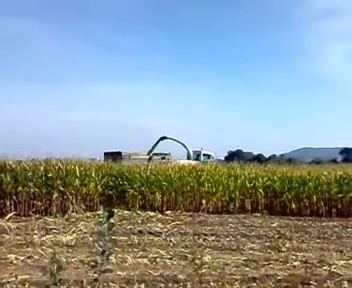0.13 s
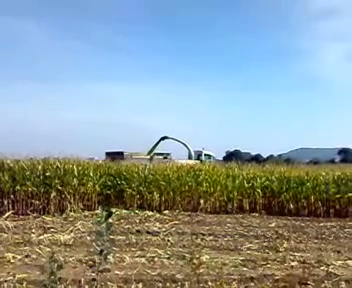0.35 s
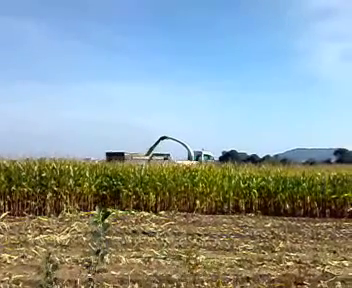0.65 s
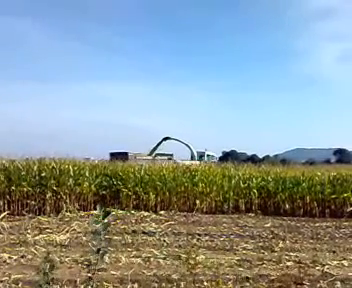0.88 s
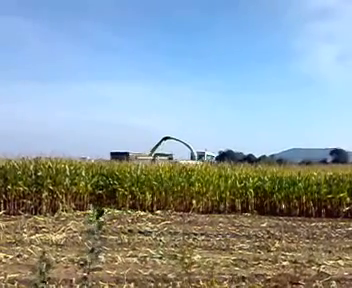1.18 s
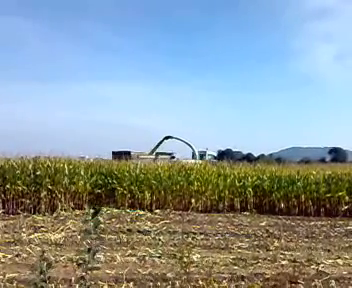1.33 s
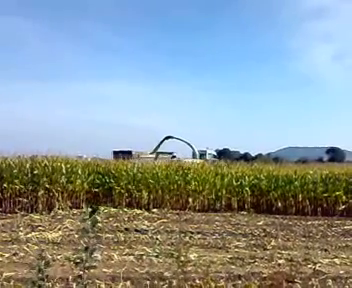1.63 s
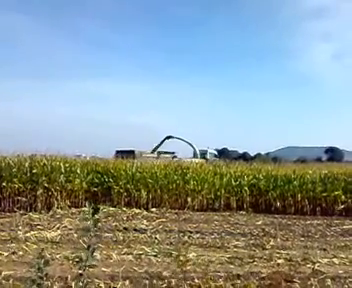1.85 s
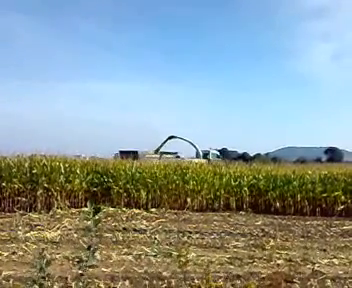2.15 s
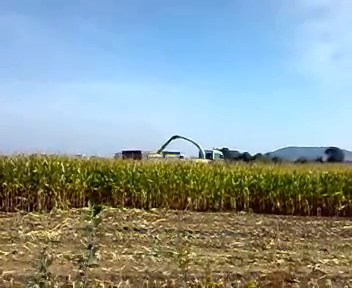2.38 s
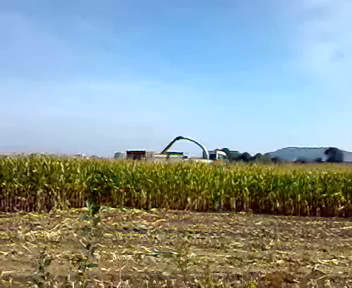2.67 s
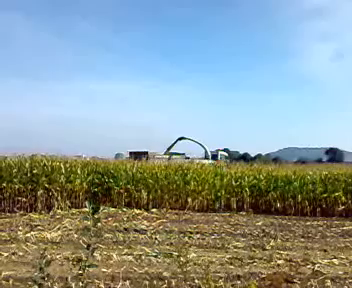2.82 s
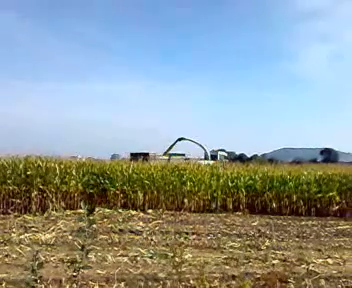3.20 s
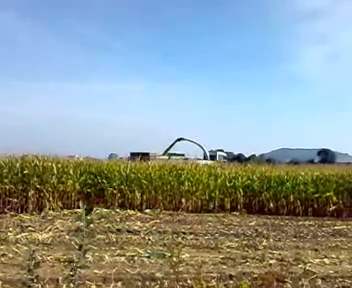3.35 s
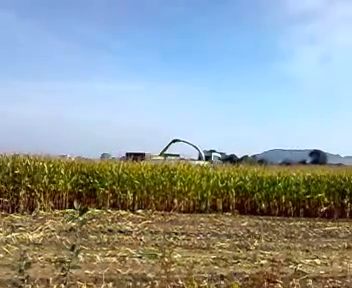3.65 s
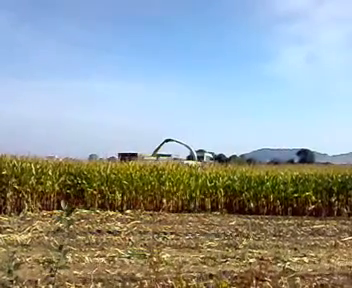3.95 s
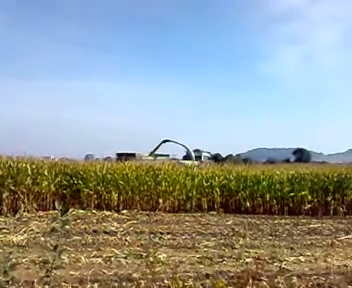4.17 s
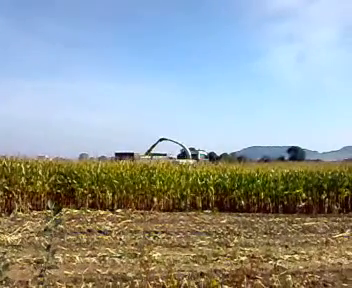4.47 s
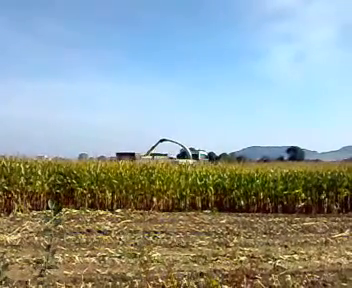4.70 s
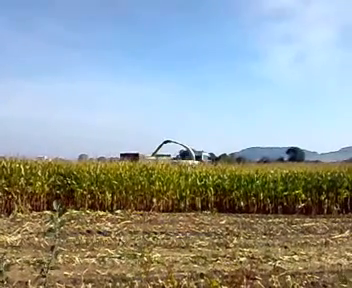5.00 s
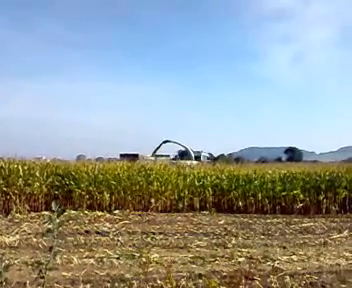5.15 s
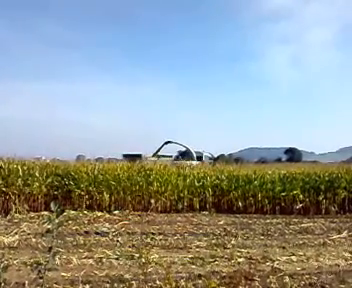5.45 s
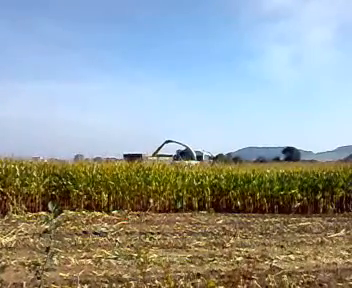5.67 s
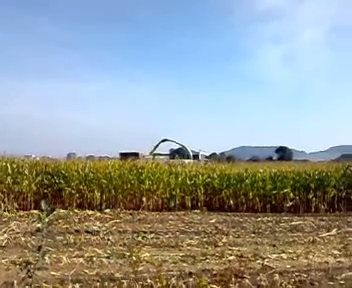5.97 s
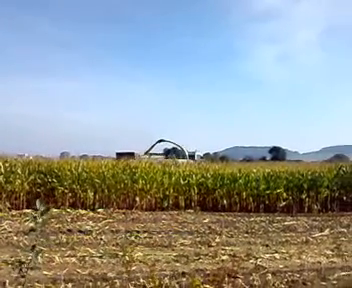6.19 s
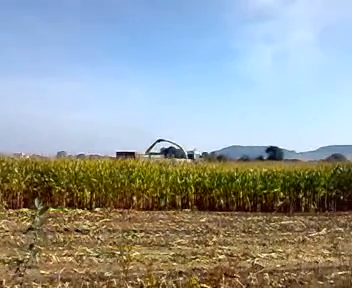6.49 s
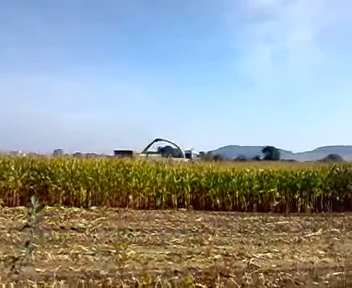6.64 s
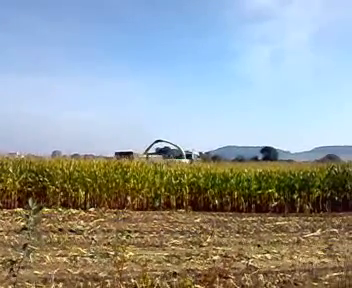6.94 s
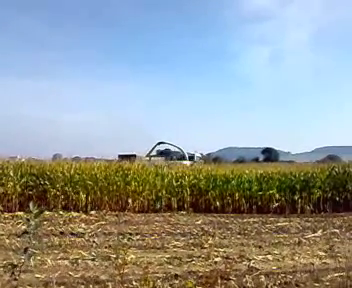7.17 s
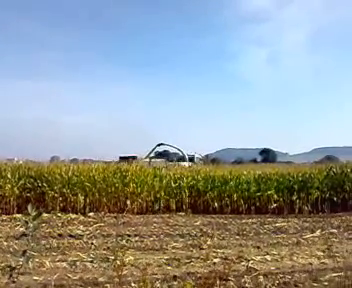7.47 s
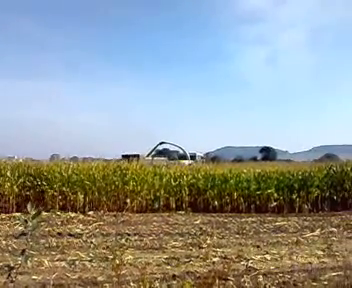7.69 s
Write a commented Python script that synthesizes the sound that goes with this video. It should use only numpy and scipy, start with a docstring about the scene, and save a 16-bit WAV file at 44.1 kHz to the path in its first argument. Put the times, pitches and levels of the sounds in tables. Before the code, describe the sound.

Distant heavy diesel machinery hums low and wavering, with a rough chopping roar, hissing crop debris and brief crackling bursts, gradually drawing away.

```python
"""A forage harvester drones, hums and roars as it chops maize in an open field and slowly draws away.
The diesel, knife hum, shaft whine and fan tone are sine waves locked to one wavering speed.
Shaped noise makes the low rumble, the housing's boom and roar, and a light breeze.
Showers of random clicks make the rattling crop, the spout's ring and hiss, and the crashing clumps."""
import sys
import numpy as np
from scipy import signal
from scipy.fft import rfft, irfft, next_fast_len
from scipy.io import wavfile
from scipy.ndimage import uniform_filter1d, map_coordinates

SR = 44100
rng = np.random.default_rng(int(sys.argv[2]) if len(sys.argv) > 2 else 0)


def inscribe(sig):
    """Save sig as 16-bit PCM at rate SR to the path in sys.argv[1].

    A 1-D sig is mono; a 2-D sig holds one channel per row.
    Samples are clipped to [-1, 1] before scaling.
    """
    pcm = np.round(np.clip(np.atleast_2d(sig).T, -1, 1) * 32767)
    wavfile.write(sys.argv[1], SR, pcm.astype(np.int16))


N = 345303


def amp(db):
    """Turn decibels into a gain."""
    return 10 ** (np.asarray(db) / 20)


def unit(x):
    """Scale a sound to an rms (average strength) of 1."""
    return x / np.sqrt(np.mean(x ** 2) + 1e-20)


def curve(rows):
    """Join (seconds, value) points with straight lines, one value per sample."""
    seconds, values = np.transpose(rows)
    return np.interp(np.arange(N) / SR, seconds, values)


def receding(start_db, fade_db_per_s):
    """Level in dB of a source that draws steadily away."""
    return start_db - fade_db_per_s * np.arange(N) / SR


def wobble(rate):
    """A smooth random curve through `rate` random points a second."""
    knots = rng.standard_normal(2048)
    # work out the curve at every 64th sample, then join those with lines
    coarse = np.arange(0, N + 64, 64)
    smooth = map_coordinates(knots, [coarse * rate / SR], mode="wrap")
    return np.interp(np.arange(N), coarse, smooth)


def filtered(x, response):
    """Multiply each frequency of x by the gain that response(hz) gives."""
    padded = next_fast_len(N + SR // 2)
    gain = response(np.fft.rfftfreq(padded, 1 / SR))
    return irfft(rfft(x, padded) * gain, padded)[:N]


def coloured(x, spectrum):
    """Shape x with (Hz, dB) points that fall away past both ends, then scale to rms 1."""
    hz_points, db_points = np.transpose(spectrum)
    hz_points = np.r_[hz_points[0] / 2, hz_points, hz_points[-1] * 2]
    db_points = np.r_[-120, db_points, -120]

    def response(hz):
        return amp(np.interp(np.log(hz + 1), np.log(hz_points), db_points))

    return unit(filtered(x, response))


def patchy(x, depth_db, size, bins, frames):
    """Raise and lower random patches of the spectrum, smoothed over frequency bins and time frames."""
    spectrum = signal.stft(x, nperseg=size)[2]
    patches = uniform_filter1d(rng.standard_normal(spectrum.shape), size=bins, axis=0)
    patches = uniform_filter1d(patches, size=frames, axis=1)
    return signal.istft(spectrum * amp(depth_db * unit(patches)), nperseg=size)[1][:N]


def drifting(x):
    """Moving air over the field strengthens and weakens broad patches of the spectrum."""
    return patchy(x, depth_db=0.85, size=512, bins=7, frames=18)


def rippled(x):
    """Sound arriving by several paths over the crop gets fine, slowly shifting peaks and notches."""
    return patchy(x, depth_db=1.6, size=2048, bins=3, frames=20)


def partials(turns, orders, flutter_db, smear, flutter_rate):
    """Sines at multiples of a rotation, each unsteady in strength and phase (smear in radians)."""
    out = np.zeros(N)
    for order, db in orders:
        phase = 2 * np.pi * (round(order) * turns + rng.random())
        phase += smear * wobble(flutter_rate)
        out += amp(db + flutter_db * wobble(flutter_rate)) * np.sin(phase)
    return np.sqrt(2) * out


def impacts(rate, spread_db):
    """Chips of stalk strike steel as clicks of random time and size, `rate` a second on average."""
    struck = rng.random(N) < rate / SR
    sizes = rng.standard_normal(N) * amp(spread_db * rng.standard_normal(N))
    return unit(struck * sizes)


def knife_passes():
    """Add up the wavering drive speed into a running count of knife passes."""
    # Each row: time in seconds, knife passes per second.
    speed = [(0, 232), (.3, 232.1), (.55, 232.9), (.95, 233.2), (1.5, 232.2), (1.9, 232.1), (2.2, 233.2),
             (2.6, 230.1), (2.9, 232), (3.3, 229.8), (3.65, 231.4), (4, 233.6), (4.4, 233.4), (4.85, 235.2),
             (5.1, 233.4), (5.5, 232.6), (6.1, 233.4), (6.5, 232.2), (6.9, 234), (7.2, 233.7), (7.6, 235.8),
             (7.83, 235.4)]
    return np.cumsum(curve(speed)) / SR


def diesel(cuts):
    """A diesel under load: a firing tone, its third harmonic, and exhaust tones around them."""
    # Firing tone. Each row: time in seconds, level in dB (before a small trim below).
    firing_level = [(0, -25), (.25, -39), (.42, -44), (.53, -26), (1.05, -30.5), (1.4, -31), (1.75, -32),
                    (2.05, -26), (2.33, -40), (2.6, -29.5), (2.8, -40), (3.38, -34.5), (3.95, -37.5),
                    (4.75, -36), (5.3, -36.5), (5.6, -36.5), (6.35, -40.5), (6.9, -33), (7.25, -40.5),
                    (7.5, -31.5), (7.83, -42)]
    # Third harmonic of the firing tone. Each row: time in seconds, level in dB.
    buzz_level = [(0, -45), (.8, -59), (1.05, -40.5), (1.5, -57), (1.95, -40), (2.3, -46), (2.62, -41.5),
                  (3, -50), (3.5, -42), (4, -52.5), (7.83, -52)]
    # Exhaust tones. Each row: multiple of the four-stroke cycle, relative level in dB.
    exhaust_tones = [(3, -6), (5, -7.5), (7, -8.5), (9, -3), (10, -6), (13, -17.5), (16, -10), (18, -13),
                     (40, -13.5), (48, -16.5), (72, -14.5)]
    cycles = cuts / 13.54
    firings = 8 * cycles
    firing = partials(firings, [(1, -.7)], flutter_db=1.5, smear=0.21, flutter_rate=5.8)
    buzz = partials(firings, [(3, 0.0015)], flutter_db=2.0, smear=0.2, flutter_rate=5)
    exhaust = partials(cycles, exhaust_tones, flutter_db=3.0, smear=0.23, flutter_rate=4)
    exhaust_db = receding(-33.5, fade_db_per_s=0.5)
    return amp(curve(firing_level)) * firing + amp(curve(buzz_level)) * buzz + amp(exhaust_db) * exhaust


def knife_hum(cuts):
    """The knives hum once per pass: a direct tone plus a smeared one off the ground, and overtones."""
    # Each row: time in seconds, level of the hum in dB.
    hum_level = [(0, -27.5), (.6, -27.5), (.85, -31), (1, -25), (1.2, -30), (1.5, -29), (1.68, -30),
                 (1.85, -27), (2.2, -29), (2.4, -24), (2.8, -32.5), (3.12, -24), (3.38, -27.5), (3.5, -31),
                 (3.6, -25), (3.8, -38), (3.92, -23.5), (4.03, -42), (4.15, -27.5), (4.62, -33),
                 (4.9, -25.5), (5.25, -28.5), (5.45, -27), (5.7, -38.5), (6.05, -32), (6.33, -31.5),
                 (6.5, -41.5), (7, -31.5), (7.48, -42.5), (7.68, -27), (7.83, -41)]
    # Each row: time in seconds, level of the overtones in dB.
    overtone_level = [(0, -42), (.4, -54), (.62, -34), (.85, -49), (1.05, -40.5), (1.5, -43.5), (2.2, -45),
                      (3, -46.5), (3.7, -50.5), (4.3, -53.5), (7.83, -53)]
    # Each row: multiple of the knife rate, relative level in dB.
    overtone_mix = [(2, -0.5), (3, -3), (4, -1)]
    direct = partials(cuts, [(1, 0.0051)], flutter_db=0.3, smear=0.079, flutter_rate=9.3)
    ground = partials(cuts, [(1, 0)], flutter_db=1, smear=2.0, flutter_rate=9)
    # the ground's share, relative to the direct tone, grows by 1.5 dB a second
    ground *= amp(receding(-23, fade_db_per_s=-1.5))
    overtones = partials(cuts, overtone_mix, flutter_db=3.0, smear=0.65, flutter_rate=6.6)
    return amp(curve(hum_level)) * unit(direct + ground) + amp(curve(overtone_level)) * overtones


def shaft_whine(cuts):
    """A fast shaft whines at 3.408 turns per knife pass."""
    # Each row: time in seconds, level in dB.
    whine_level = [(0, -49.5), (.18, -37.5), (.6, -34), (1.1, -36), (1.4, -33.5), (1.7, -38), (1.92, -41),
                   (2.3, -46), (2.62, -32.5), (2.95, -50.5), (4.82, -53), (4.97, -35), (5.3, -41),
                   (5.65, -50), (6.5, -39), (6.8, -54), (7.83, -46)]
    whine = partials(cuts * 3.408, [(1, 0)], flutter_db=2.0, smear=0.058, flutter_rate=14.0)
    return amp(curve(whine_level)) * whine


def fan_tone(cuts):
    """The fan sounds one tone at 1.447 times the knife rate and fades as it draws away."""
    fan = partials(1.447 * cuts, [(1, 0)], flutter_db=3.0, smear=0.45, flutter_rate=3.6)
    return amp(receding(-43.5, fade_db_per_s=0.65)) * fan


def body():
    """The running machine rumbles, and the drum housing booms around the knife rate: shaped noise."""
    # Low rumble. Each row: frequency in Hz, strength in dB per Hz.
    rumble_colour = [(25, -16.5), (40, -7), (65, 1.9), (85, .5), (105, -0.5), (150, -1.3), (190, -6),
                     (260, -20.5), (400, -41.5)]
    # Each row: time in seconds, level of the rumble in dB.
    rumble_level = [(0, -27), (.75, -34), (1.05, -30), (1.42, -26), (1.8, -32), (2.1, -27), (2.55, -33),
                    (2.8, -29), (3.4, -27.5), (3.8, -31), (4.5, -31.5), (5.1, -31.5), (5.4, -32),
                    (6.4, -34.5), (7.83, -31)]
    # Housing's boom. Each row: frequency in Hz, strength in dB per Hz.
    boom_colour = [(150, -28.5), (205, -4.5), (225, 0), (260, 2.5), (276, 1), (295, -6), (315, -3),
                   (337, -14), (354, -19), (500, -45.5)]
    # Each row: time in seconds, level of the boom in dB.
    boom_level = [(0, -26.5), (.85, -30), (1.45, -26), (2.3, -29.5), (2.9, -26), (4.2, -30), (6.9, -28.5),
                  (7.5, -31)]
    rumble = coloured(rng.standard_normal(N), rumble_colour)
    boom = coloured(rng.standard_normal(N), boom_colour)
    return amp(curve(rumble_level)) * rumble + amp(curve(boom_level)) * boom


def chopping(cuts):
    """Knife passes pulse the roar and rattle, thick crop swells rattle and hiss, uneven feed flutters all."""
    # Each row: time in seconds, swell of the crop flow in dB.
    flow = [(.1, -0.5), (.36, 0.9), (.62, 0.5), (1.02, -0.5), (1.32, 1.9), (1.9, 1), (2.18, 0), (2.38, 2),
            (2.52, 2.5), (2.74, 2), (2.9, 0.2), (3.22, -1), (3.55, 0), (4.4, 0.7), (4.75, -.5), (5.28, 3),
            (5.5, -0.5), (5.75, -0.4), (6.1, 2.2), (6.6, 1.9), (7.4, 0.2), (7.83, 1.3)]
    # Housing's roar. Each row: frequency in Hz, strength in dB per Hz.
    roar_colour = [(250, -29), (370, -8.5), (450, -5), (560, -0.5), (610, -1), (680, 2.5), (750, -5),
                   (900, -3.5), (1010, -9), (1400, -36.5)]
    # Each row: time in seconds, level of the roar in dB, before the feed's flutter.
    roar_level = [(0, -27), (1.2, -27.5), (2.25, -29), (2.7, -28), (3.3, -28.5), (3.65, -27), (4, -29),
                  (4.6, -29), (5.1, -30.5), (6.05, -31), (6.45, -29.5), (7.1, -31.5), (7.83, -30.5)]
    # Rattling chips. Each row: frequency in Hz, strength in dB per Hz.
    rattle_colour = [(700, -29.5), (1030, -4), (1270, 2), (1480, -2), (1680, -0.5), (1860, -7),
                     (2030, -4.5), (2230, -6.5), (2450, -13), (2900, -15.5), (3900, -32), (5000, -52)]
    # Each row: time in seconds, level of the rattle in dB, before swell and flutter.
    rattle_level = [(0, -29), (.15, -29), (.55, -28), (1.1, -30.5), (2, -31.5), (2.6, -32.5), (3.2, -32.5),
                    (4.35, -32), (5.2, -34), (6.05, -34), (6.35, -33.5), (6.75, -34), (7.4, -35),
                    (7.83, -36)]
    # Broad resonance of the spout wall. Each row: frequency in Hz, strength in dB per Hz.
    ring_colour = [(2200, -28.5), (2600, -8), (2900, -3.5), (3080, 0.5), (3220, 1), (3450, -5.5),
                   (3800, -12), (4500, -38.5)]
    # Each row: time in seconds, level of the ring in dB, before the flutter.
    ring_level = [(0, -38.5), (.33, -35.5), (.85, -40), (1.3, -39), (1.9, -39.5), (2.17, -41), (2.52, -37),
                  (3.15, -42), (3.8, -40.5), (4.4, -40.5), (5.1, -41), (5.3, -38.5), (5.75, -46),
                  (6.1, -41.5), (6.55, -40.5), (7.1, -42), (7.4, -45), (7.83, -45.5)]
    # Hiss in the spout. Each row: frequency in Hz, strength in dB per Hz.
    hiss_colour = [(3000, -27), (3950, -6), (4250, -1.5), (4800, 0), (5350, -1.5), (5850, -7.5),
                   (6500, -11), (7300, -16.5), (7600, -24)]

    strokes = 1 + 0.041 * np.cos(2 * np.pi * cuts)
    roar = coloured(drifting(strokes * rng.standard_normal(N)), roar_colour)
    rattle = coloured(rippled(strokes * impacts(rate=26000, spread_db=0.5)), rattle_colour)
    # chips scour the steel spout: one broad wall resonance and a hiss above it
    ring = coloured(rippled(impacts(rate=15000, spread_db=4.0)), ring_colour)
    hiss = coloured(rippled(impacts(rate=24000, spread_db=2.0)), hiss_colour)

    # rattle and hiss each follow the flow's swells by their own share (dB per dB)
    swell_db, feed = curve(flow), wobble(38)
    roar_db = curve(roar_level) + 0.11 * feed
    rattle_db = curve(rattle_level) + 0.54 * swell_db + 0.13 * feed
    ring_db = curve(ring_level) + 0.85 * feed + 0.27 * wobble(18)
    hiss_db = receding(-38, fade_db_per_s=1) + 1.2 * swell_db
    hiss_db += 0.59 * feed + 0.16 * wobble(16)
    return amp(roar_db) * roar + amp(rattle_db) * rattle + amp(ring_db) * ring + amp(hiss_db) * hiss


def breeze():
    """A light breeze buffets in the deep bass: low noise that comes and goes."""
    # Each row: frequency in Hz, strength in dB per Hz.
    breeze_colour = [(12, -14.5), (22, -4.5), (35, -0.5), (55, 1), (80, -14)]
    # Each row: time in seconds, level in dB.
    breeze_level = [(0, -34), (.65, -44), (1.35, -32), (1.9, -43), (2.5, -43.5), (3.15, -34.5), (3.6, -34),
                    (4.1, -42.5), (4.9, -46), (5.7, -41), (6.6, -43.5), (7.83, -42)]
    return amp(curve(breeze_level)) * coloured(rng.standard_normal(N), breeze_colour)


def clumps():
    """A clump of stalks is a brief surge of coarse chips: it crashes on the spout wall and sprays out."""
    # Each row: middle in seconds, crash level in dB, half-length in seconds, spray level in dB.
    clump_rows = [(.225, -31.5, .016, -50), (0.325, -32, .016, -49.5), (1.229, -43.5, 0.022, -47),
                  (1.46, -43, 0.013, -43.5), (1.863, -46.5, .015, -42), (2.501, -43, 0.0073, -37),
                  (2.575, -39.5, .008, -37.5), (2.624, -46, .014, -45.5), (2.718, -45, .02, -45),
                  (2.878, -41.5, .011, -45.5), (3.464, -42.5, .02, -42), (3.809, -37, 0.011, -47.5),
                  (4.032, -40, 0.011, -38.5), (4.267, -40.5, .018, -50.5), (4.74, -41.5, .014, -47.5),
                  (5.253, -40.5, .025, -50.5), (6.525, -45, .018, -51.5)]
    # Crash. Each row: frequency in Hz, strength in dB per Hz.
    crash_colour = [(900, -14), (1500, -3), (2100, -2), (2500, -11.5), (3150, 10), (3800, -5.5), (4800, -4),
                    (5800, -13), (7300, -19)]
    # Spray. Each row: frequency in Hz, strength in dB per Hz.
    spray_colour = [(3200, -19.5), (4200, -0.5), (4900, 3.5), (5700, -4), (6600, -11), (7400, -14)]
    t = np.arange(N) / SR
    crash_gain, spray_gain = np.zeros((2, N))
    for middle, crash_db, length, spray_db in clump_rows:
        surge = np.exp(-.5 * ((t - middle) / length) ** 2)
        crash_gain += amp(crash_db) * surge
        spray_gain += amp(spray_db) * surge
    crash = coloured(impacts(rate=4700, spread_db=1.5), crash_colour)
    spray = coloured(impacts(rate=8100, spread_db=2.5), spray_colour)
    return crash_gain * crash + spray_gain * spray


def scene():
    """The harvester, far off in the open field, with all its tones locked to the knife passes."""
    cuts = knife_passes()
    tones = diesel(cuts) + knife_hum(cuts) + shaft_whine(cuts) + fan_tone(cuts)
    return (tones + body() + chopping(cuts) + breeze() + clumps())[None]


def record(dry):
    """Cut away everything from 7520 Hz upward."""
    return filtered(dry[0], lambda hz: hz < 7520)[None]


dry = scene()
out = record(dry)
inscribe(out)
```